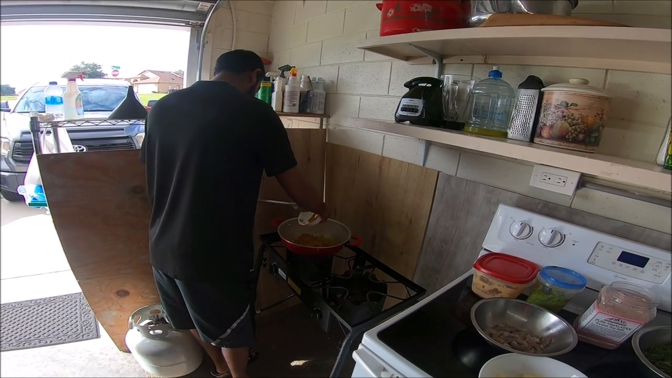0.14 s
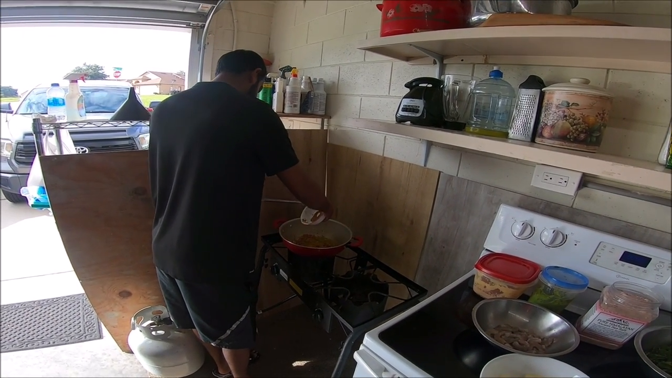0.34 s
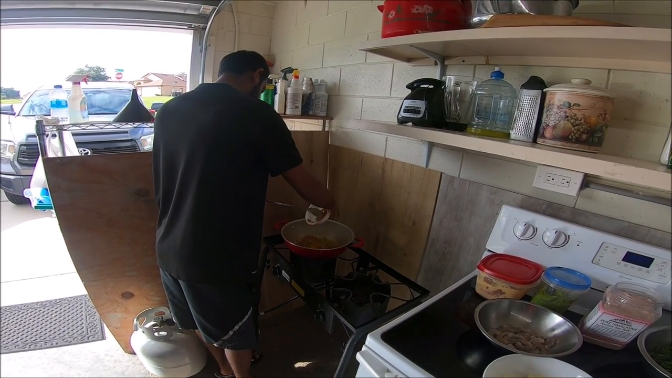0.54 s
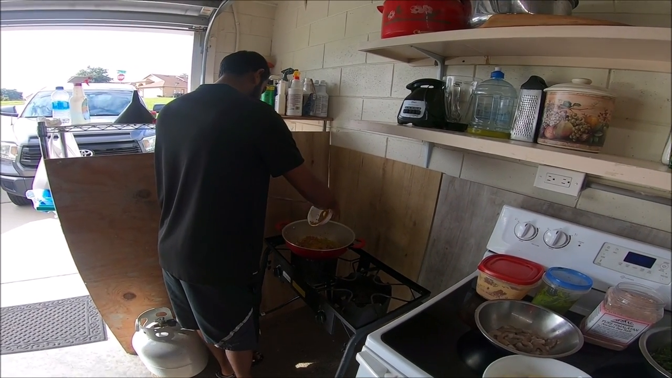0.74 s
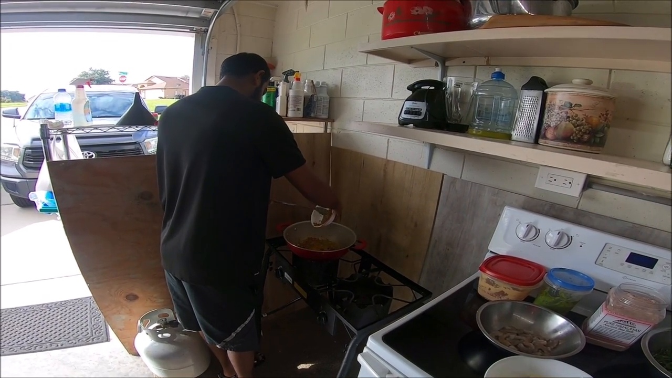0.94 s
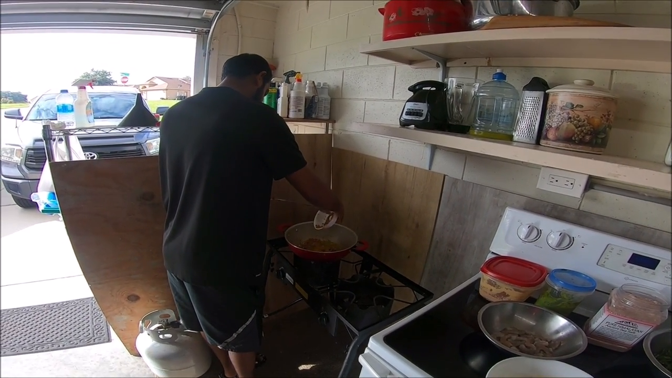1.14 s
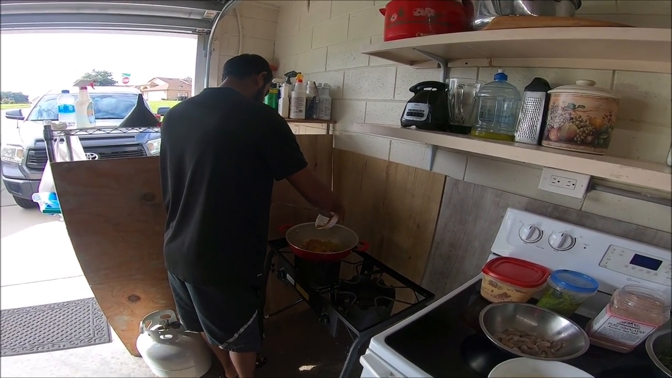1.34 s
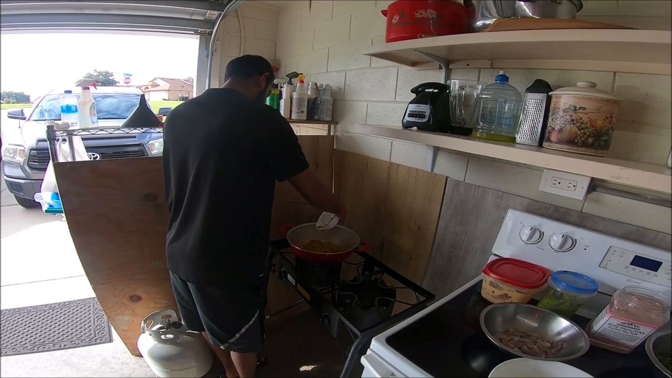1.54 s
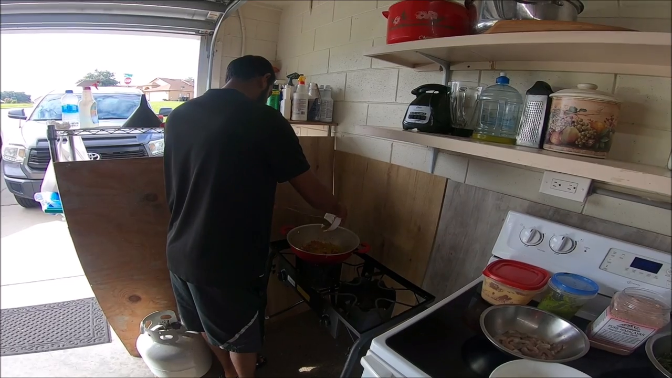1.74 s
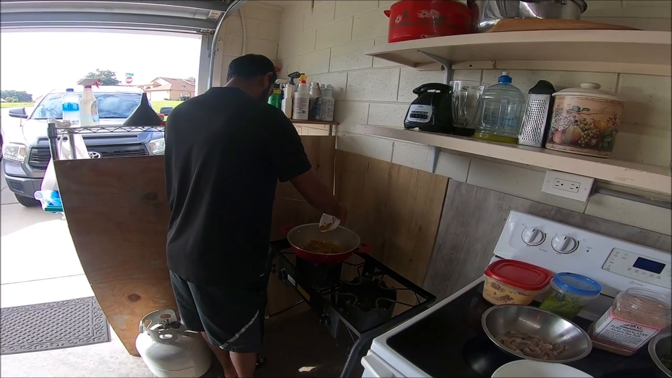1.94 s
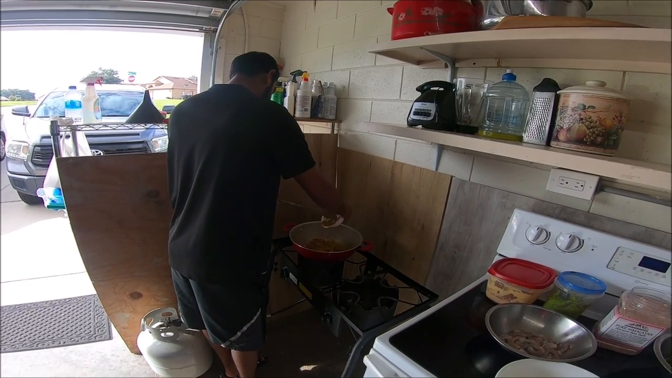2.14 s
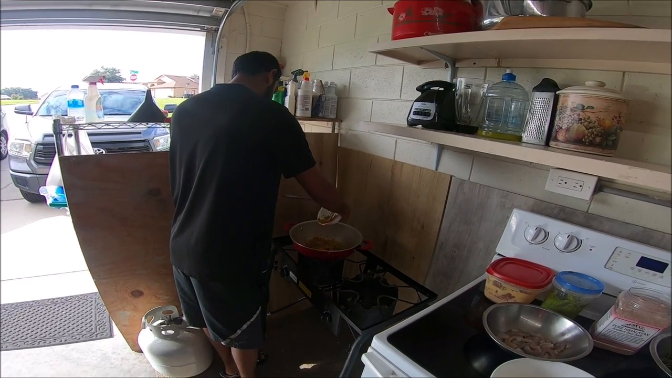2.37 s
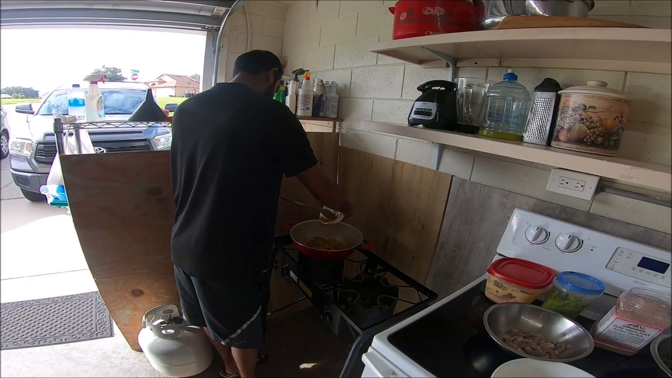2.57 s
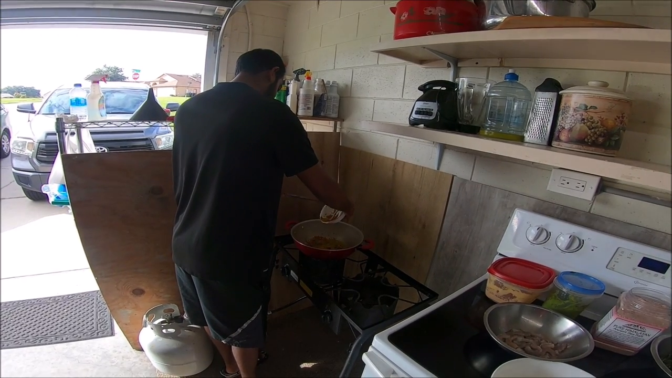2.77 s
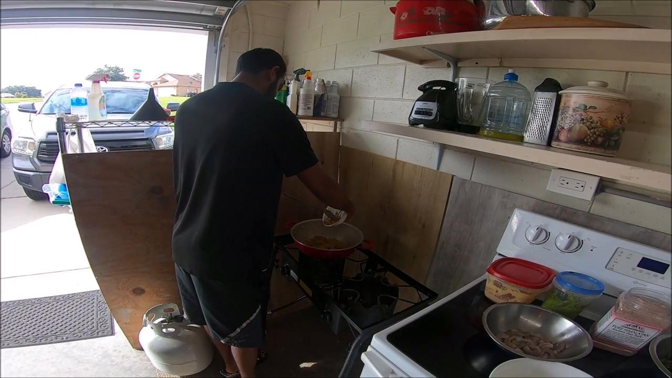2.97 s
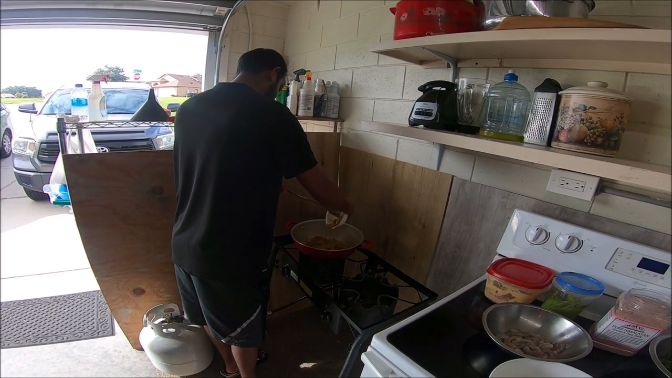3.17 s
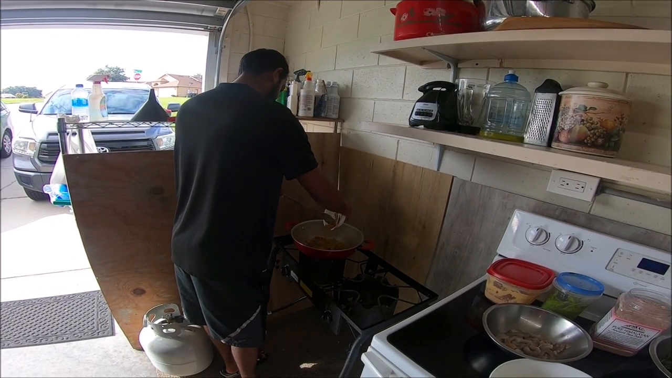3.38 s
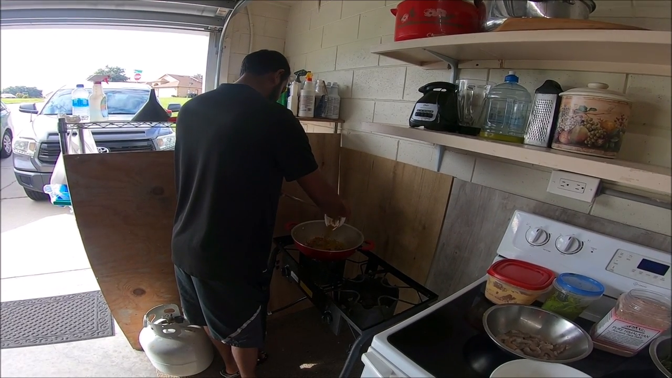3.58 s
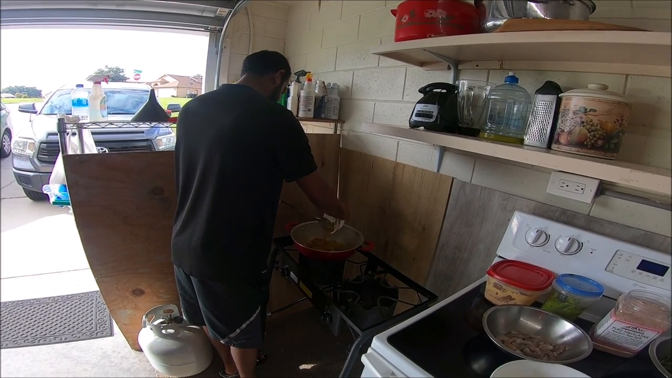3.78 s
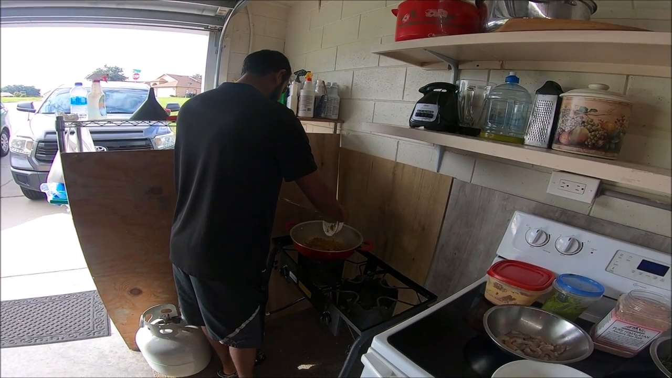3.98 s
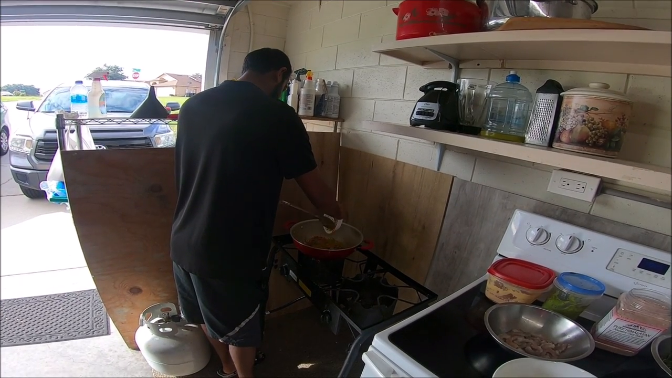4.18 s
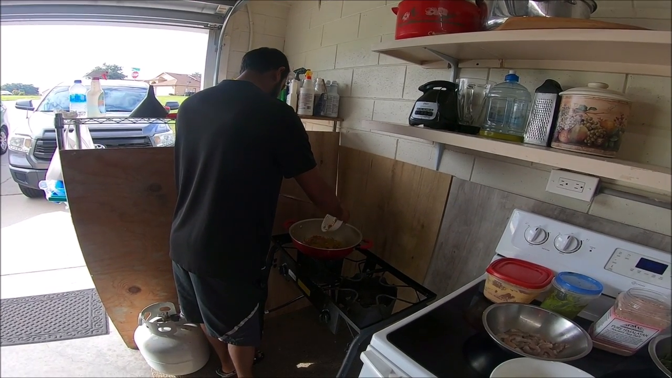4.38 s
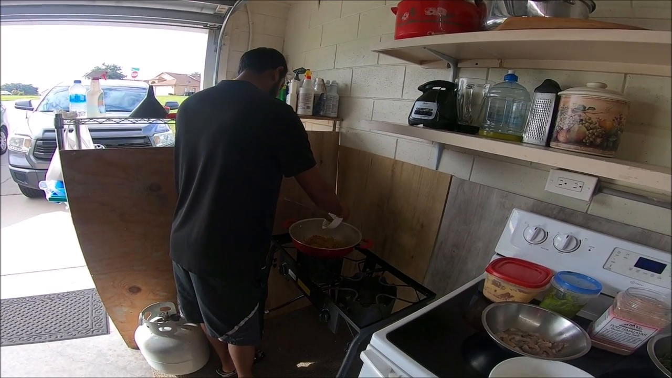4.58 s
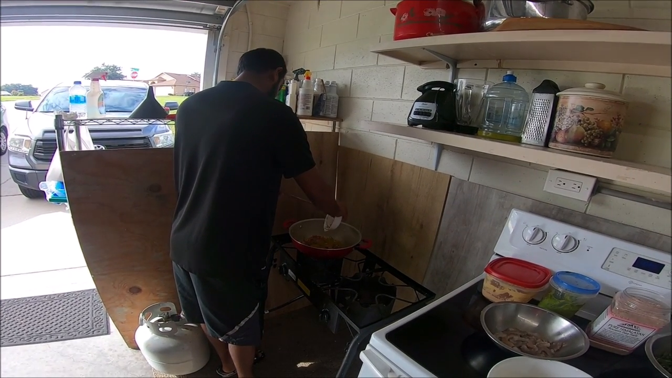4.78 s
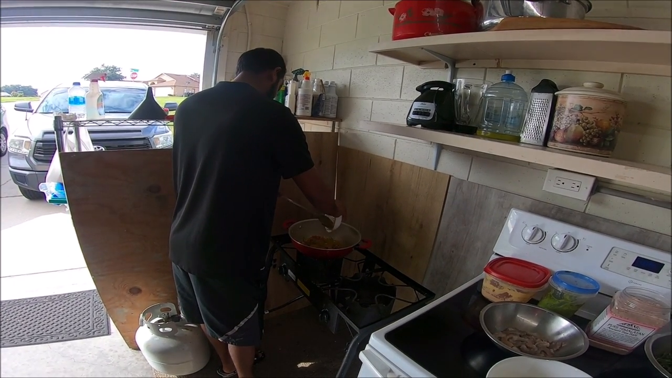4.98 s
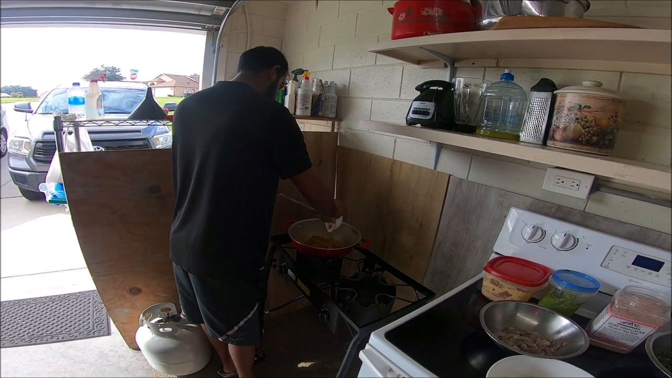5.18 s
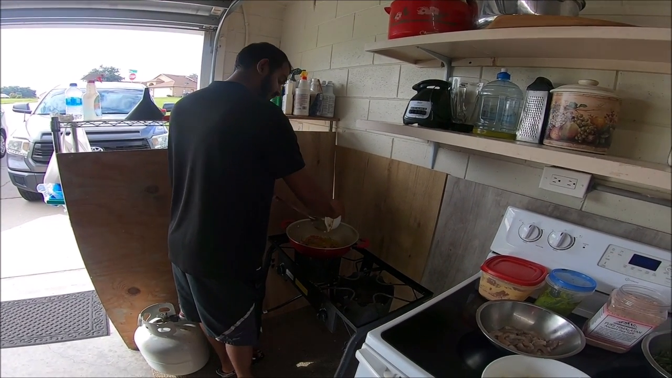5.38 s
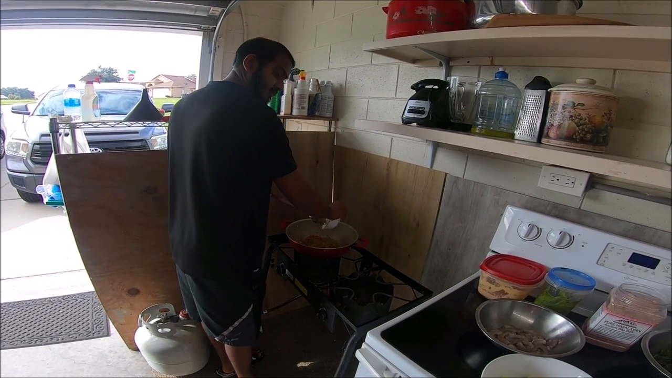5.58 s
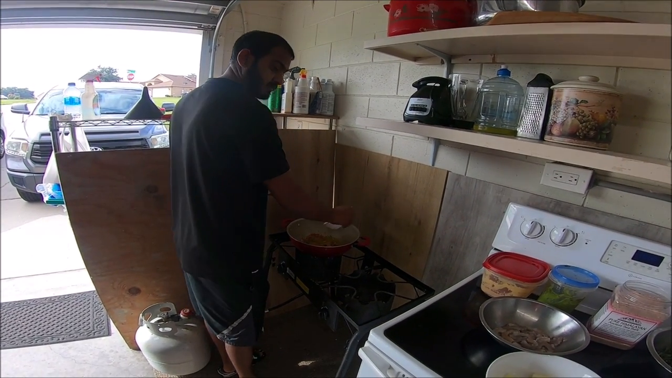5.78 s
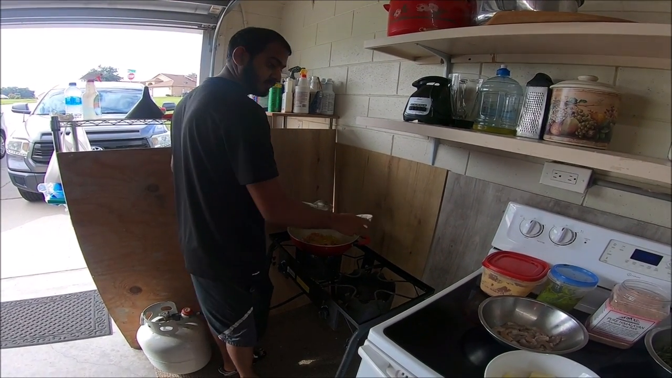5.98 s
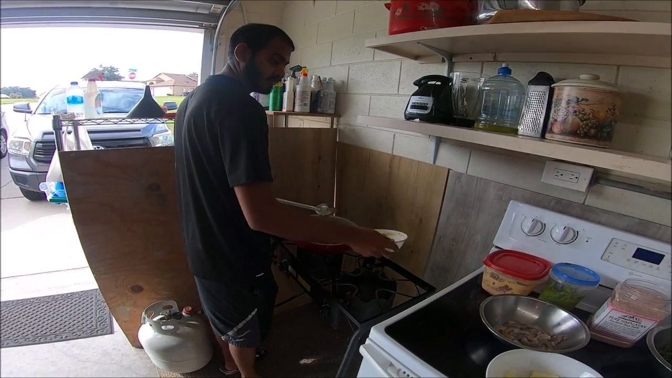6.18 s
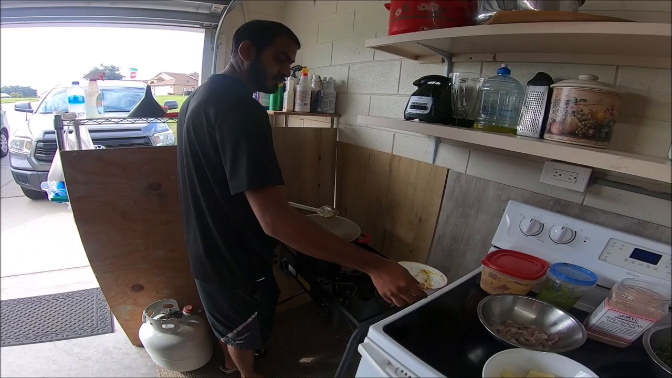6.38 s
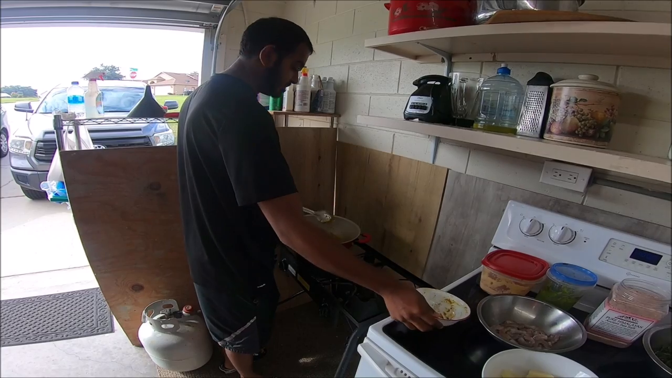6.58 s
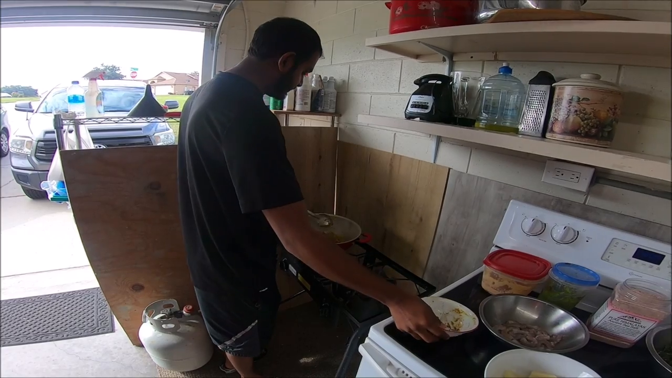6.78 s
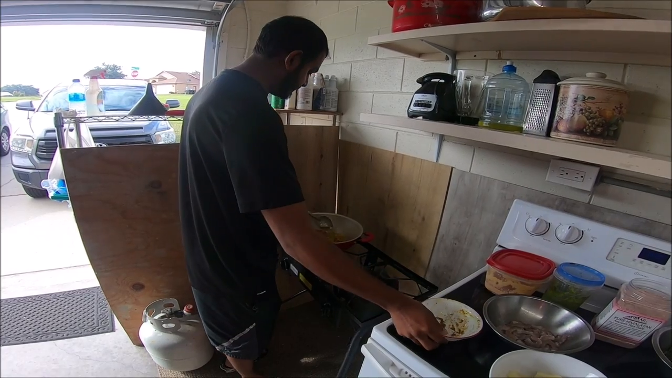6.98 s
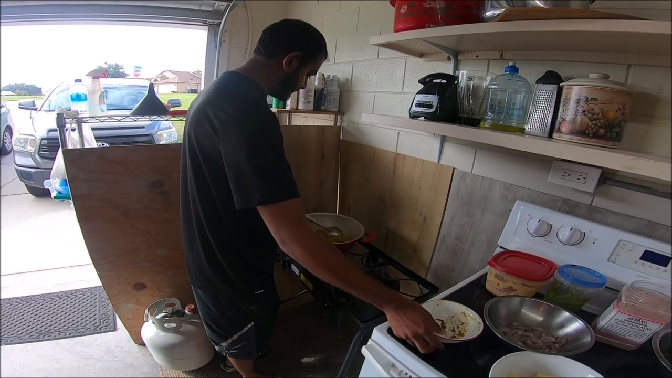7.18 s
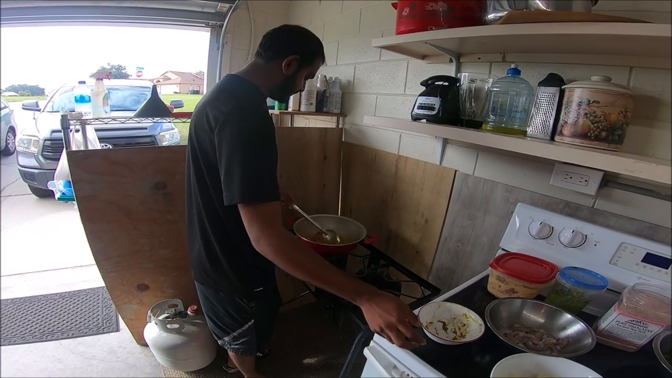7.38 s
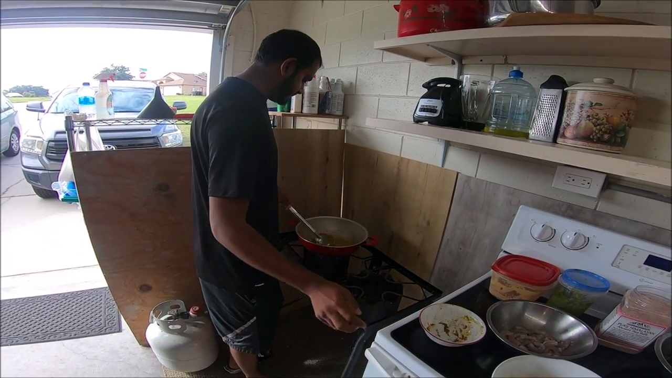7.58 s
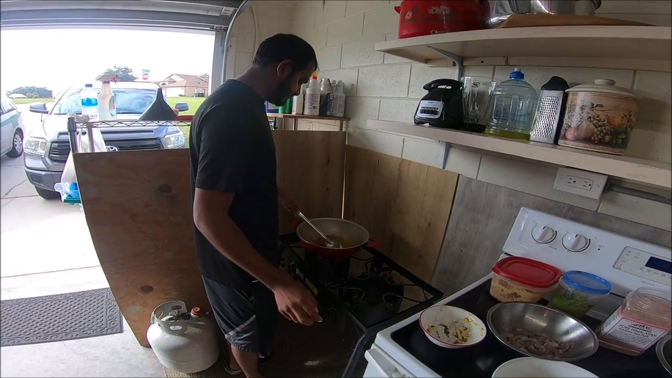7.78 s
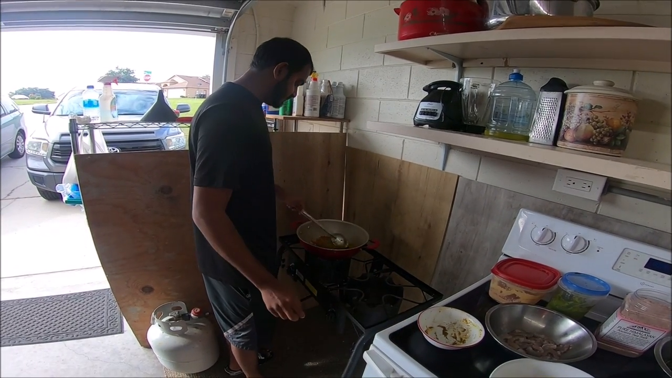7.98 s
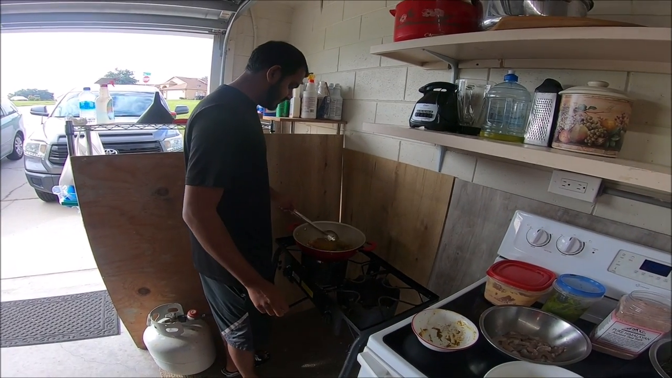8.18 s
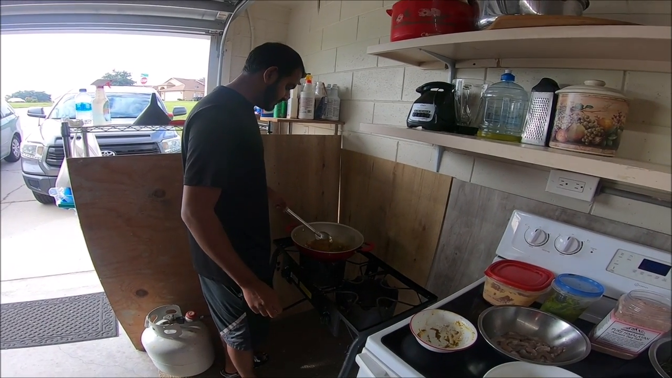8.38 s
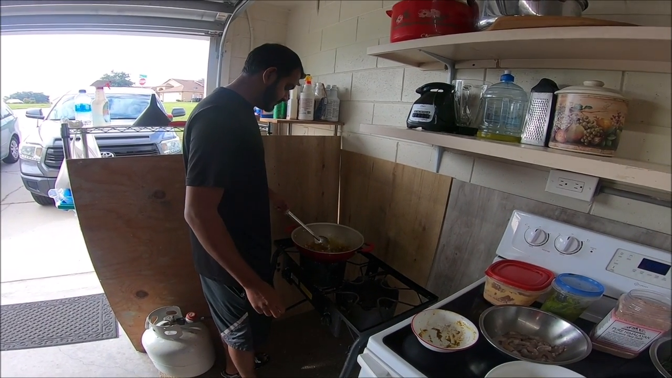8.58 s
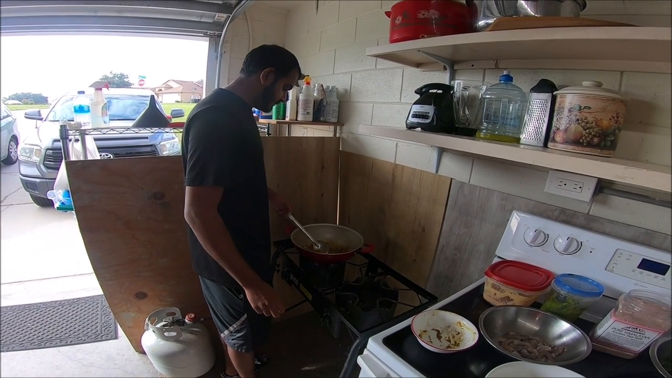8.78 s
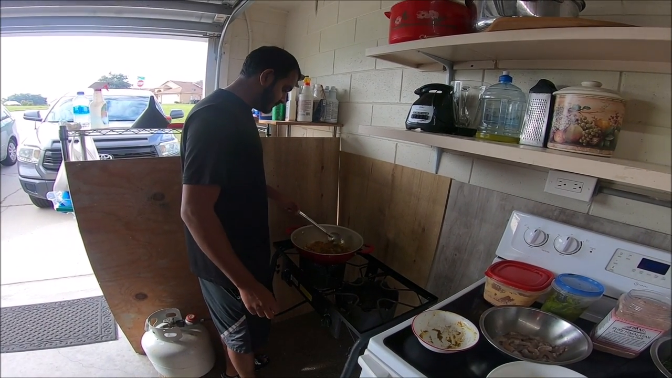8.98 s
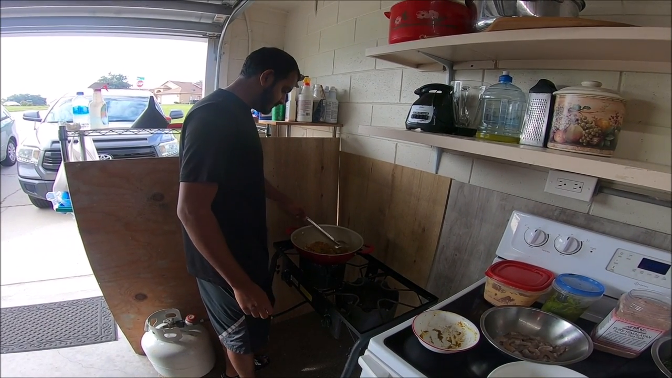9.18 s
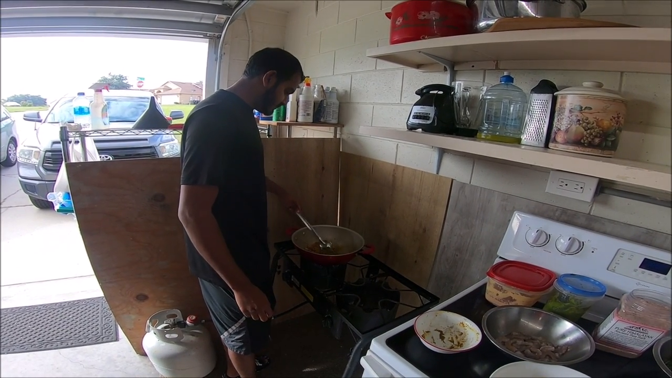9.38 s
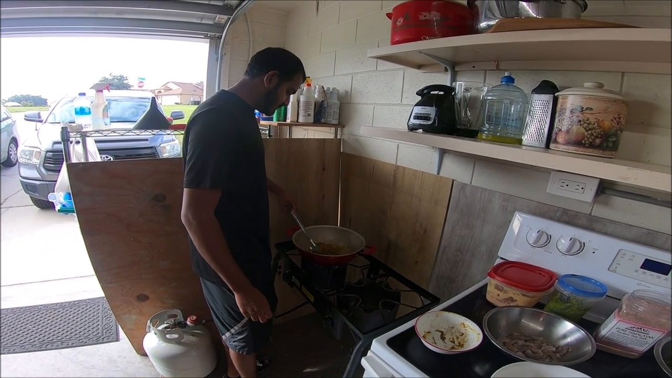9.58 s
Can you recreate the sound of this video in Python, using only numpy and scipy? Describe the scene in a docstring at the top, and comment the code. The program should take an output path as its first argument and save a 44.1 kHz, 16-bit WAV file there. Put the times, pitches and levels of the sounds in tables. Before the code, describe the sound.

In the corner of an open garage, spices fry in hot oil with a steady, dense sizzle over a soft gas flame and low rumble. A metal spoon knocks the pan irregularly for almost six seconds. A plate then lands on the stove top and settles, and the sizzle grows stronger. Near the end the pan is nudged on its grate.

```python
"""In the corner of an open garage, spices fry in hot oil in a pan on a gas burner.
A metal spoon knocks the pan and a plate lands on the stove top and rocks once: noise contacts excite damped modes.
Dense random bubble bursts make the sizzle, harder when the oil is left unstirred; short tones make the spits.
Random slips make soft scuffs in the pan and, near the end, the nudge of the pan on its grate.
Filtered noise makes the burner's roar and a low rumble that swells now and then."""
import sys
import numpy as np
from scipy import signal
from scipy.fft import rfft, irfft, next_fast_len
from scipy.io import wavfile
from scipy.ndimage import uniform_filter1d

SR = 44100
rng = np.random.default_rng(int(sys.argv[2]) if len(sys.argv) > 2 else 0)


def materialize(psi):
    """Save the field psi as 16-bit PCM at rate SR to the path in sys.argv[1].

    A 1-D psi becomes a single channel; in a 2-D psi each row is a channel.
    """
    bounded = np.clip(np.atleast_2d(psi).T, -1, 1)
    quanta = np.round(bounded * 32767).astype(np.int16)
    wavfile.write(sys.argv[1], SR, quanta)


N = 424683
TIME = np.arange(N) / SR


def undb(db):
    """Level to amplitude ratio: 20 dB is a factor of ten."""
    return 10 ** (np.asarray(db) / 20)


def unit(x):
    """Normalisation to an rms of 1."""
    return x / np.sqrt(np.mean(x ** 2))


def unit_attack(x):
    """Normalisation of a transient by its onset: the first 25 ms get an rms of 1."""
    return x / np.sqrt(np.mean(x[..., :SR // 40] ** 2))


def colour(x, points):
    """Minimum-phase filtering: the folded cepstrum of a (f/Hz, level/dB) response makes it causal."""
    hz, db = np.transpose(points)
    n = 2 * next_fast_len(x.shape[-1] // 2 + 2048)
    freq = np.maximum(np.arange(n // 2 + 1) * SR / n, 1)
    response_db = np.interp(np.log(freq), np.log(hz), db)
    cepstrum = irfft(np.log(undb(response_db)))
    cepstrum[1:n // 2] *= 2
    cepstrum[n // 2 + 1:] = 0
    response = np.exp(rfft(cepstrum))
    return irfft(rfft(x, n) * response, n)[..., :x.shape[-1]]


def below(x, hz):
    """Zero-phase low-pass filtering: the part of a sound under a frequency."""
    return signal.sosfiltfilt(signal.butter(3, hz, fs=SR, output="sos"), x)


def walk(rate):
    """Smoothed random steps, rate per second: a slow drift of rms 1."""
    k = int(SR / rate)
    steps = np.repeat(rng.standard_normal(N // k + 1), k)
    return unit(uniform_filter1d(steps, k)[:N])


def fade(t60):
    """Exponential decay, 60 dB in t60 seconds, one second long."""
    return undb(-60 * TIME[:SR] / t60)


def ring(modes, scatter_db):
    """Modal superposition: damped sinusoids whose shares vary with the striking point."""
    total = np.zeros(SR)
    for hz, db, t60 in modes:
        share = undb(db + scatter_db * rng.standard_normal())
        phase = rng.random()  # in cycles
        total += share * fade(t60) * np.sin(2 * np.pi * (hz * TIME[:SR] + phase))
    return total


def spread(pair):
    """Mid-side stereo: a side signal weak in the bass makes left and right agree there."""
    # side relative to mid for sound from all round: f/Hz, level/dB
    width = [(60, -18.5), (170, -16.5), (380, -6), (700, -6.5), (1290, -2.5), (2400, -6.5), (4400, -8.5),
             (8000, -0.5), (15000, 0)]
    side = colour(pair[1], width)
    return np.array([pair[0] + side, pair[0] - side])


def garage(x, early_db, late_db, early_t60=0.12, late_t60=0.33, corner_s=0.0014):
    """Reverberation by convolution: direct sound, corner reflections and a duller, slower-rising tail."""
    onset = np.minimum(TIME[:SR] / corner_s, 1) ** 2
    early = unit(rng.standard_normal((2, SR)) * fade(early_t60) * onset)
    diffuse = colour(rng.standard_normal((2, SR)), [(1500, -3.5), (4000, -8.5), (12000, -6.5)])
    late = unit(diffuse * fade(late_t60) * (1 - fade(0.28)))
    echoes = spread(undb(early_db) * early + undb(late_db) * late) / np.sqrt(SR)
    return x + signal.fftconvolve(x[None], echoes, axes=1)[:, :len(x)]


def add(out, s, sound):
    """Linear superposition: mix a sound in at time s in seconds."""
    i = int(s * SR)
    out[:, i:i + sound.shape[1]] += sound[:, :N - i]


def spoon(ring_db=-7, spot_db=-5.0, second_db=-2, clack_t60=0.037, bounce_db=-3, bounce_s=.003, gain_db=1):
    """Impact excitation: the oil-damped pan clacks, the spoon rebounds and lightly damped modes ring."""
    # spoon on pan: t/s, level before gain_db/dB, body weight/dB, brightness/dB,
    # first and second resonance favoured by the struck spot f/Hz
    knocks = [(0.286, -23.5, -3, 0, 4950, 3090), (0.5, -35, 5.5, -1, 7730, 1367),
              (0.836, -39, 10, 20, 7600, 7460), (0.911, -38, 10, -21, 1320, 2400),
              (1.324, -25, -1, 4.5, 7090, 3050), (1.373, -34.5, 11, 4, 1368, 7630),
              (1.706, -25.5, -0.5, 6, 7530, 6320), (1.744, -35.5, 4, 1.5, 7500, 3290),
              (1.809, -35.5, 10, -1, 1010, 2370), (1.842, -41, 0, -3, 980, 1410),
              (2.103, -38.5, 3.5, 1, 6700, 4920), (2.296, -26, 3, 0, 2720, 4350),
              (2.8863, -29, 5, -3.5, 2860, 2380), (3.1935, -26.5, 0, 2.5, 3220, 7320),
              (3.261, -32.5, 7, -7, 2900, 3360), (3.361, -29.5, 6, 1, 2695, 3150),
              (3.664, -24, 3, 3, 3360, 6990), (4.1355, -25.5, -1.5, 2, 3225, 4860),
              (4.551, -40.5, 7, -10, 638, 3110), (4.6268, -26, 12, -1.5, 2914, 880),
              (4.681, -39, 5, -5, 864, 1340), (4.9446, -27.5, 0.5, -2.5, 3125, 4700),
              (5.377, -29, -0.5, 0, 4360, 4770), (5.7359, -22, -0.5, -1.5, 6860, 2774),
              (6.718, -46, 0, -4, 2530, 3530)]
    # pan and spoon: f/Hz, level/dB, t60/s
    pan_modes = [(642, 0.5, 0.055), (1004, -20, 0.44), (1293, -10, 0.2), (2323, -0.5, 0.12),
                 (2694, 2, 0.052), (2830, -17.5, 0.14), (3160, 10, 0.059), (3190, 3.5, 0.15),
                 (3140, -7, 0.099), (4430, 6.5, 0.047), (5040, 7, 0.041), (4880, -3.5, 0.29),
                 (5780, 2, 0.09), (6480, 4, 0.099), (6770, -20, 0.068), (6900, -13, 0.14), (7600, 0, 0.07),
                 (8200, -3, 0.2)]
    # the pan's dense, quickly damped modes: f/Hz, spectral density/dB per Hz
    clack_colour = [(50, -52), (200, -10.5), (430, -15.5), (640, -1), (1400, -5), (2000, -4), (3100, 6),
                    (3800, -0.5), (4900, 2.5), (5600, -6), (7300, 2), (8200, -7), (8700, -9.5),
                    (11000, -18), (15500, -43)]
    out = np.zeros((2, N))
    for s, db, body_db, bright_db, first_hz, second_hz in knocks:
        contact = unit_attack(rng.standard_normal(SR) * fade(clack_t60))
        rebound = unit_attack(rng.standard_normal(SR) * fade(0.0059))
        delay = int(SR * bounce_s * 2 * rng.random())  # bounce_s is the mean
        contact = contact + undb(bounce_db) * np.roll(rebound, delay)
        clack = unit_attack(garage(colour(contact, clack_colour), early_db=1.5, late_db=-7.0))
        ringing = unit_attack(garage(ring(pan_modes, scatter_db=1.5), early_db=-1, late_db=-14))
        # blows on the bottom are heavy and dull, blows on the rim thin and bright
        tone = [(400, 0), (800, body_db), (1400, body_db), (2400, 0), (3700, 0), (5500, bright_db)]
        knock = unit_attack(colour(clack + undb(ring_db) * ringing, tone))
        # the two modes that move most at the struck spot stand out
        spot = ring([(first_hz, 0, .09), (second_hz, second_db, .07)], scatter_db=0)
        spot = unit_attack(garage(spot, early_db=-2.0, late_db=-10.5))
        add(out, s, (knock + undb(spot_db) * spot) * undb(db + gain_db))
    return out


def plate(ring_db=-9, pan_db=-3.5):
    """Contact-time filtering: a hard landing, right of centre, is bright; the soft settling loses treble."""
    # plate on the stove top: t/s, level/dB, contact time/s, thump level/dB, late room level/dB
    landings = [(6.894, -20.5, 0.00037, -5.5, -5), (7.147, -31, 0.012, -12, -7.5)]
    # plate: f/Hz, level/dB, t60/s
    plate_modes = [(369, -10, 0.35), (523, -3.5, 0.17), (904, -9, 0.085), (1262, -6, 0.13),
                   (1560, -10, 0.24), (1895, -12, .17), (2170, 8, 0.046), (3170, -3, 0.12),
                   (3166, -10, .14), (5280, 14.5, 0.025)]
    # sheet-metal stove top: f/Hz, level/dB, t60/s
    stove_modes = [(151, -2.5, 0.2), (169.2, 0, 0.15), (285, -14.5, 0.19)]
    # clatter of the plate: f/Hz, spectral density/dB per Hz
    clatter_colour = [(60, -12), (200, -4), (600, -4), (1050, -0.5), (1350, -1), (1900, 0), (2500, 1),
                      (3200, 1.5), (4200, -14.5), (5400, -12), (7500, -20), (15000, -53)]
    balance = undb([[pan_db / 2], [-pan_db / 2]])  # left, right
    out = np.zeros((2, N))
    for s, db, contact_s, thump_db, room_db in landings:
        # a long contact swells slowly and loses its treble
        push = rng.standard_normal(SR) * fade(.04) * np.minimum(TIME[:SR] / contact_s, 1)
        clatter = unit_attack(colour(push, clatter_colour))
        china = clatter + undb(ring_db) * unit_attack(ring(plate_modes, scatter_db=1.5))
        china = colour(china, [(1200, 0), (2400, -800 * contact_s)])
        china = unit_attack(garage(china, early_db=-1, late_db=room_db))
        # the stove top drums with a softened onset
        thump = unit_attack(ring(stove_modes, scatter_db=0.0) * (1 - fade(0.022)))
        add(out, s, undb(db) * (china * balance + undb(thump_db) * thump))
    return out


def sizzle(bursts_per_s=12000, hiss_db=-4, flutter_db=0.96, simmer_db=-42.5, simmer_follow=0.36,
           oil_gain_db=0.5, spray_db=-44, spray_follow=1.0):
    """Shot noise: steam bubbles burst in the oil so densely that they merge into a hiss."""
    # how hard the oil fries, easing off while stirred and flaring up when left alone:
    # t/s, level before oil_gain_db/dB
    frying = [(0.0, -42.5), (0.45, -44.5), (2.84, -45), (3.19, -44), (3.43, -45.5), (5.77, -45.5),
              (5.92, -46.5), (7.13, -46), (8.34, -39), (9.63, -41.5)]
    # overall colour of the sizzle as heard, with a steep drop above 8 kHz:
    # f/Hz, spectral density/dB per Hz
    sizzle_colour = [(250, -18.5), (480, -16.5), (800, -6.5), (1400, -2.5), (2100, -1.5), (3600, 0.5),
                     (5300, -1.5), (6600, -0.5), (7900, 2), (8500, -7), (10200, -10), (11200, -18.5),
                     (13500, -23), (15500, -60)]
    oil_db = np.interp(TIME, *np.transpose(frying))
    flare_db = oil_db - oil_db.mean()
    sizes = undb(1.5 * np.minimum(rng.exponential(size=(2, N)), 3))
    bursts = (rng.random((2, N)) < bursts_per_s / SR) * rng.standard_normal((2, N)) * sizes
    hiss = undb(hiss_db) * rng.standard_normal((2, N))
    fizz = unit(colour(unit(bursts) + hiss, sizzle_colour))
    low, coarse = below(fizz, 2300), below(fizz, 5100)
    # harder frying adds mostly small bubbles; each size comes and goes in its own flurries
    large = low * undb(simmer_db + simmer_follow * flare_db + flutter_db * walk(14))
    small = (coarse - low) * undb(oil_db + oil_gain_db + flutter_db * walk(25))
    tiny = (fizz - coarse) * undb(spray_db + spray_follow * flare_db + flutter_db * walk(30))
    return spread(large + small + tiny)


def spits(count=120, level_db=-54, scatter_db=2):
    """Damped oscillation: slightly larger drops of water pop in the oil, barely above the hiss."""
    out = np.zeros((2, N))
    for when, pitch, size in rng.random((count, 3)):
        hz = 2200 * 4 ** pitch  # two octaves of range
        pop = unit_attack(np.sin(2 * np.pi * hz * TIME[:SR]) * fade(.003))
        # level_db is about that of the largest drop
        add(out, when * TIME[-1], pop[None] * undb(level_db + scatter_db * np.log(size + 0.0063)))
    return garage(out[0], early_db=1.5, late_db=-17)


def scrape(modes, length, slips_per_s=2500):
    """Stick-slip friction: uneven slips excite the modes, swelling and dying with the stroke."""
    stroke = np.sin(np.pi * np.minimum(TIME[:SR] / length, 1)) ** 2
    slips = (rng.random(SR) < slips_per_s / SR) * rng.standard_normal(SR) * stroke
    sound = signal.fftconvolve(slips, ring(modes, scatter_db=0.5))[:SR]
    # energy grows with length
    return unit(garage(sound, early_db=-1.0, late_db=-13.5)) * np.sqrt(length)


def scrapes(nudge_s=9.23, nudge_length=0.22, nudge_db=-41):
    """Friction-driven resonance: soft scuffs in the pan, and the pan nudged on its grate."""
    # soft scuffs in the pan: t at the middle/s, length/s, level/dB, centre f/Hz
    scuffs = [(2.415, 0.11, -54, 1400), (3.0, .1, -48.5, 3050), (4.495, 0.16, -54.5, 1770),
              (5.226, 0.11, -47, 1590), (6.585, .14, -57, 1610), (7.498, 0.084, -52, 1700),
              (8.355, 0.046, -44, 2690), (9.155, 0.1, -55, 1610)]
    # pan sliding on the grate: f/Hz, level/dB, t60/s
    grate_modes = [(353, -5, 0.017), (554, -8.5, 0.14), (1020, -5, 0.029), (1225, -3.5, 0.033),
                   (1690, -5.5, 0.028), (1880, 2.5, .012), (2580, 1, 0.0093), (3100, -4, 0.0074),
                   (3920, 4.5, 0.0054)]
    out = np.zeros((2, N))
    for s, length, db, hz in scuffs:
        add(out, s - length / 2, undb(db) * scrape([(hz, 0, .007)], length))
    add(out, nudge_s, undb(nudge_db) * scrape(grate_modes, nudge_length))
    return out


def burner(flame_db=-56.2, rumble_db=-61.5, waver_db=2.5, rise=0.22):
    """Broadband noise: the flame roars softly over a wavering rumble that swells quickly and ebbs."""
    # roar of the flame: f/Hz, spectral density/dB per Hz
    flame_colour = [(60, -13.5), (110, -10.5), (148, 3.5), (170, -4.5), (192, -0.5), (250, -8),
                    (380, -16.5), (700, -15.5), (2000, -42)]
    # low rumble: f/Hz, spectral density/dB per Hz
    rumble_colour = [(20, 8), (38, -9), (54, 26.5), (68, 6), (100, 16.5), (150, -38)]
    # swells of the rumble: start t/s, length/s, peak level/dB
    swell_times = [(0.06, 0.6, -46), (2.68, 0.35, -52.5), (3.163, 0.11, -48), (4.44, 0.24, -48),
                   (4.757, 0.12, -45.5), (7.15, 0.55, -53), (7.94, 0.18, -53), (8.698, 1.15, -53.5)]
    flame = unit(colour(rng.standard_normal((2, N)), flame_colour)) * undb(flame_db)
    swells = np.zeros(N)
    for s, length, db in swell_times:
        # rise is the share of the length spent rising
        swells += undb(db) * np.interp((TIME - s) / length, [0, rise, 1], [0, 1, 0])
    # steady and swelling parts add in power
    strength = np.hypot(undb(rumble_db + waver_db * walk(8)), swells)
    rumble = unit(colour(rng.standard_normal((2, N)), rumble_colour)) * strength
    return spread(flame + rumble)


def scene():
    """Superposition of all the sources round the burner."""
    return spoon() + plate() + sizzle() + spits() + scrapes() + burner()


def record(dry, cut_hz=15100):
    """Band limiting: a steep elliptic low-pass filter removes the top treble."""
    return signal.sosfilt(signal.ellip(8, .2, 70, cut_hz, fs=SR, output="sos"), dry)


dry = scene()
out = record(dry)
materialize(out)
```